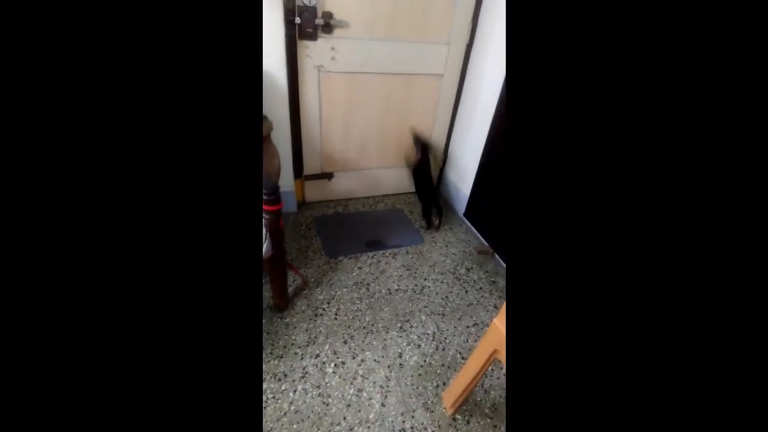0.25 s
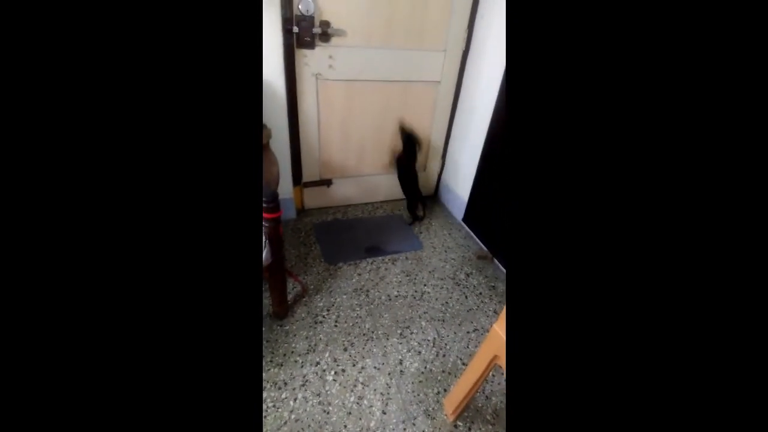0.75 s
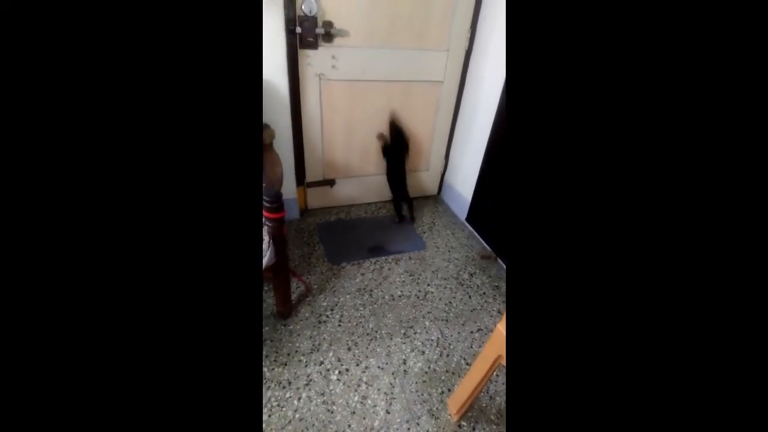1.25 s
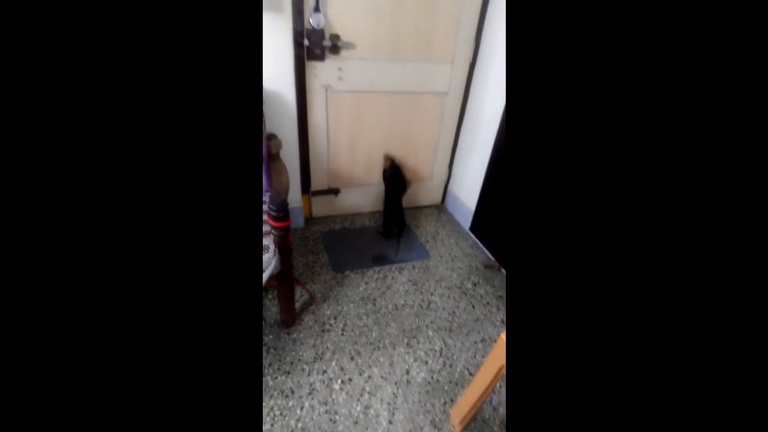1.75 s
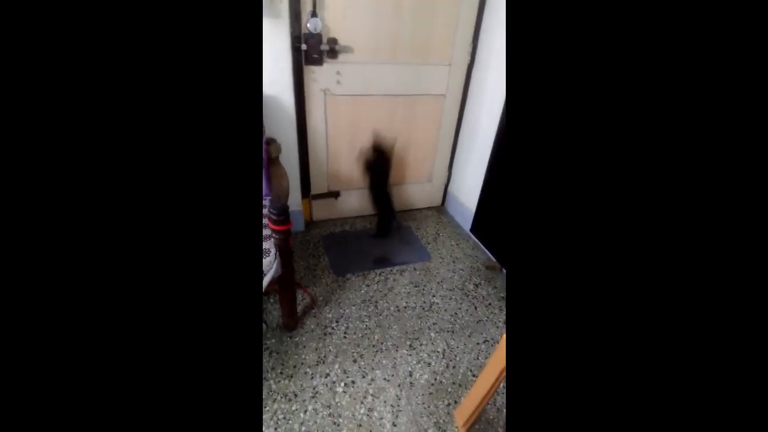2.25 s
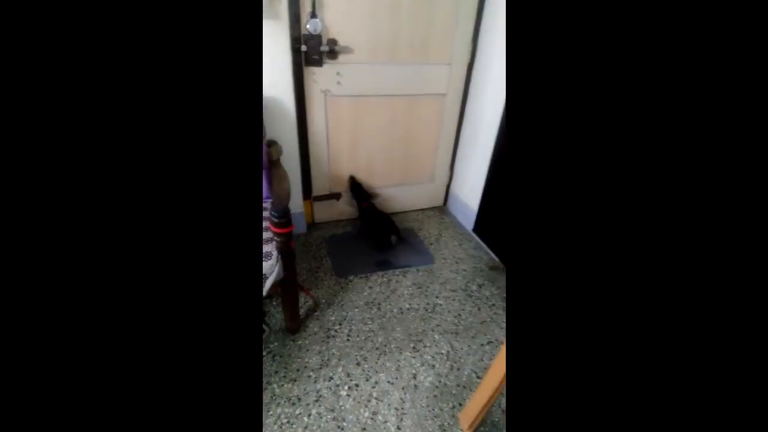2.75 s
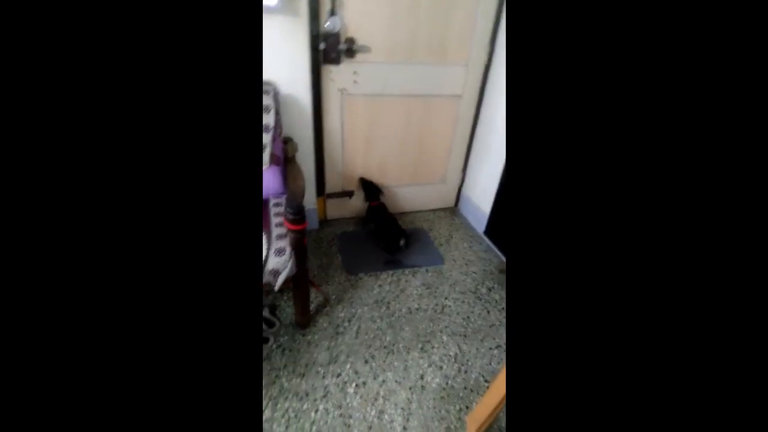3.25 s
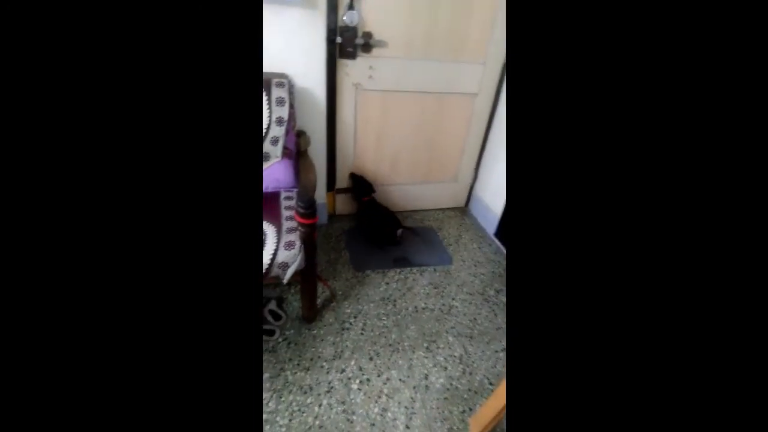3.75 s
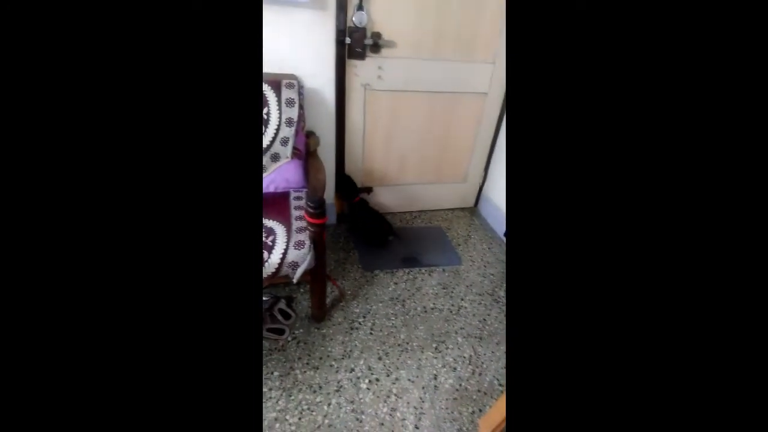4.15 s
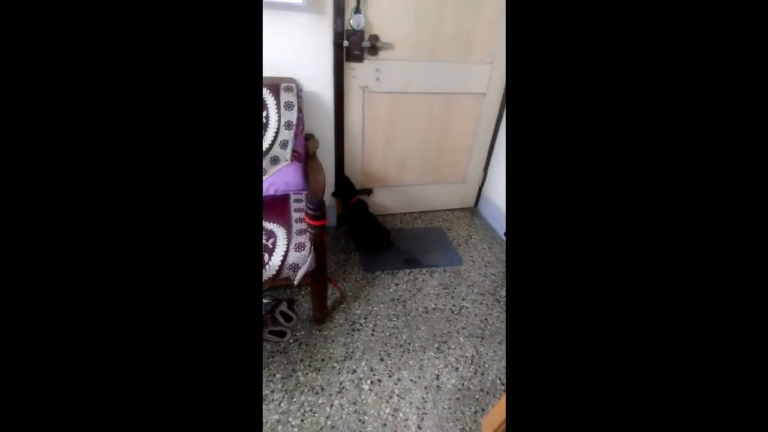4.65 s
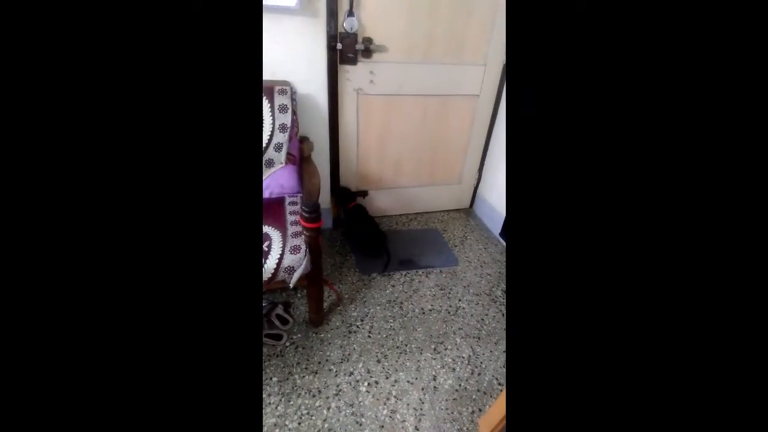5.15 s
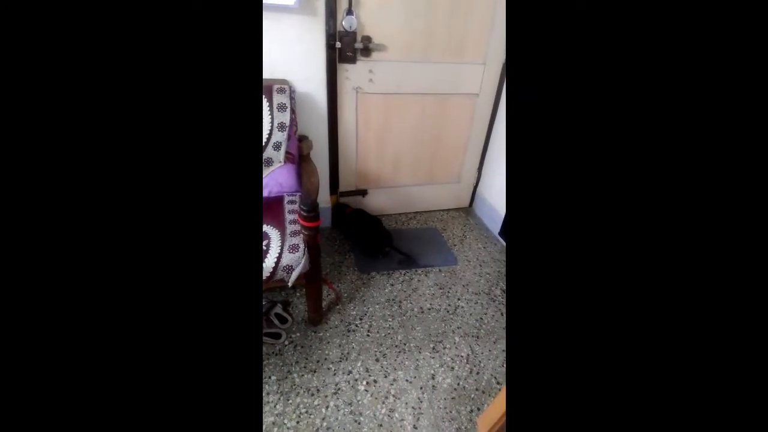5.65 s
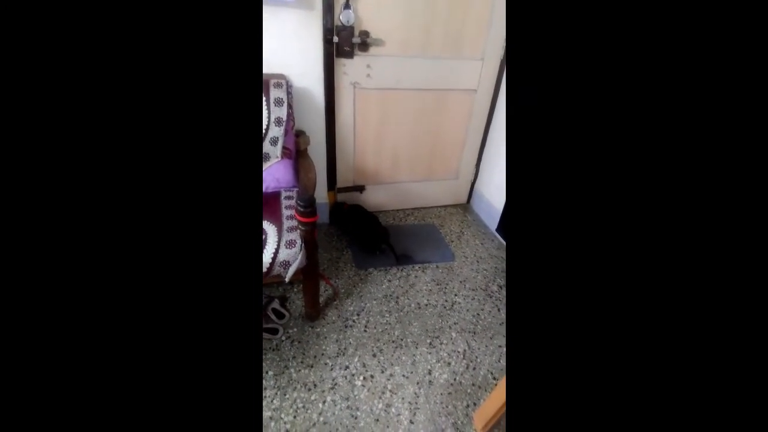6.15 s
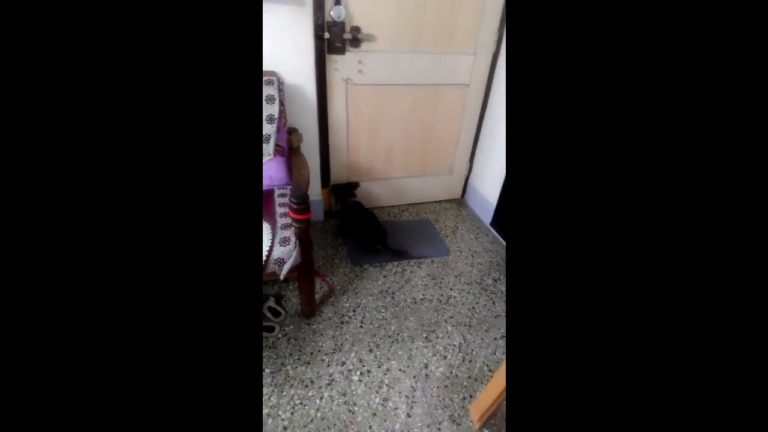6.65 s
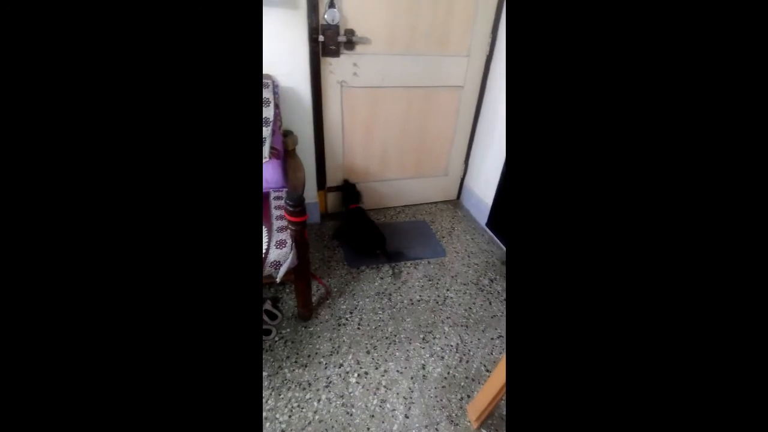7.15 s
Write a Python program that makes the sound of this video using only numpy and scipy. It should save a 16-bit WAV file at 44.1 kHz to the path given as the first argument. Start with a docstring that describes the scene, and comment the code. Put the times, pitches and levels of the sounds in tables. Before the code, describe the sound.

In a hard-floored, reverberant room, a small puppy cries a few metres from the microphone over a quiet low hush and hum. From 0 to 3.2 s short whines and yelps follow almost back to back, wavering around 400 to 900 Hz, nasal and breathy; a longer one slides down at about 2.75 to 3.05 s. Its paws bump a loose door with deep, dull thumps, strongest near 1.4 to 1.7 s and again at 2.7 s, with light scrapes and claw ticks, clearest at 1.4 s. A tiny squeak and weak whimper come around 3.4 s, a rising whine at 3.8 to 4 s, then very faint whimpering and thin nose whistles until 4.9 s. A piercing yelp drops steeply at 5.05 s, another lower one at 5.4 s. After near quiet with faint whistles, sharp falling yelps return at 6.5 and 7 s, the last trailing into a whimper.

```python
"""Puppy at a wooden door

A small puppy whines and yelps in a hard-floored room, heard from a few metres away.
Its cries are stacks of harmonics and pulsed breath shaped by the throat; its nose whistles with gliding tones.
Its paws ring the loose door panel at a few low pitches, and its claws tick and scrape as bursts of noise.
Short echoes and a fading tail of noise make the room ring, over a soft hush and a household hum.
"""
import sys
import numpy as np
from scipy import signal
from scipy.fft import rfft, irfft, next_fast_len
from scipy.io import wavfile
from scipy.ndimage import uniform_filter1d, map_coordinates

SR = 44100
rng = np.random.default_rng(int(sys.argv[2]) if len(sys.argv) > 2 else 0)


def generate_wav(signal):
    """Clip the signal to [-1, 1] and save it as 16-bit WAV at the path in sys.argv[1]."""
    frames = np.transpose(np.atleast_2d(signal))
    scaled = np.clip(frames, -1, 1) * 32767
    pcm = np.round(scaled).astype(np.int16)
    wavfile.write(sys.argv[1], SR, pcm)


def makeup_ratio(level_db):
    """Linear amplitude ratio for a level in decibels (20 dB per factor of ten)."""
    decades = np.asarray(level_db, float) / 20
    return 10 ** decades


N = 325987
T = np.arange(N) / SR  # time of every sample, s

# All levels in the tables are relative: the functions mix and scale them further.
# The puppy's cries, one curve each: (time [s], middle pitch [Hz], effort [dB])
CRY_CURVES = [
    [(0.0, 474, -42), (0.03, 461, -59), (0.055, 426, -58)],
    [(0.12, 506, -43.5), (0.14, 644, -41), (0.165, 740, -36), (0.19, 795, -37), (0.245, 740, -40),
     (0.275, 655, -34.5), (0.33, 651, -42.5), (0.355, 667, -37.5), (0.375, 792, -34), (0.43, 786, -63)],
    [(0.622, 435, -45.5), (0.65, 463.4, -43), (0.672, 539, -46.5), (0.692, 598.5, -39)],
    [(0.7, 803, -42), (0.75, 809.6, -38.5), (0.782, 794.5, -44.5), (0.81, 706, -43.5), (0.835, 664, -47.5),
     (0.9, 684, -71)],
    [(1.115, 780, -49.5), (1.15, 790, -36.5), (1.2, 657, -39.5), (1.27, 633, -41), (1.29, 653, -37),
     (1.32, 753.5, -39), (1.36, 709, -36.5), (1.42, 748, -71)],
    [(1.575, 577.3, -38), (1.61, 596, -41), (1.635, 639, -41), (1.665, 609.7, -41.5), (1.725, 589, -46.5),
     (1.745, 517, -38), (1.775, 489, -33.5), (1.85, 440, -42.5), (1.875, 419, -69)],
    [(1.95, 430, -51), (1.985, 438.3, -45), (2.003, 441, -33), (2.015, 490.4, -34.5), (2.045, 478, -53)],
    [(2.05, 560.5, -43), (2.075, 717, -36), (2.1, 710, -44.5), (2.113, 673, -25.5), (2.13, 650, -61.5),
     (2.16, 670, -45), (2.28, 714.4, -70)],
    [(2.295, 942, -41.5), (2.33, 941.5, -35.5), (2.347, 859, -45.5), (2.362, 722, -39), (2.387, 644, -35.5),
     (2.445, 631.3, -44), (2.51, 554, -32.5)],
    [(2.52, 408.5, -39.5), (2.54, 369.7, -41), (2.57, 379.4, -50), (2.63, 384.2, -58)],
    [(2.745, 684, -36.5), (2.773, 767.4, -30.5), (2.817, 508, -33), (2.857, 461.5, -32.5),
     (2.9, 444.5, -35), (2.977, 404.7, -35), (3.05, 351.7, -37)],
    [(3.06, 306, -44.5), (3.09, 292.7, -48.5), (3.2, 283, -50.5), (3.27, 282.4, -80)],
    [(3.372, 1060, -54), (3.378, 1120, -45.5), (3.405, 1144, -61), (3.445, 1101, -67)],
    [(3.455, 467.4, -54), (3.485, 450, -68), (3.495, 436, -43.5), (3.52, 432, -61.5), (3.535, 430, -53),
     (3.562, 400, -46.5), (3.575, 400, -74), (3.64, 435, -78)],
    [(3.785, 563.4, -48), (3.805, 639.7, -44), (3.818, 701, -39.5), (3.88, 724.4, -37), (3.945, 791, -39),
     (3.995, 762, -45), (4.02, 761, -56)],
    [(4.195, 690, -47), (4.23, 680, -56), (4.29, 671, -59.5), (4.44, 618.5, -65.5), (4.52, 648.5, -62.5),
     (4.7, 634, -73.5), (4.92, 667.5, -63.5)],
    [(5.04, 1666, -82), (5.052, 1646, -34.5), (5.061, 1566, -22.5), (5.067, 1410, -27.5),
     (5.074, 1292, -39), (5.09, 1240, -25), (5.11, 916, -32), (5.14, 680, -35.5), (5.188, 562, -34),
     (5.27, 577.7, -78)],
    [(5.376, 852, -43), (5.41, 812.4, -36), (5.46, 436, -27.5), (5.48, 359.6, -36.5), (5.512, 363, -35),
     (5.56, 410, -68)],
    [(6.52, 1620, -53), (6.535, 1600, -37), (6.541, 1528, -23), (6.549, 1401, -34), (6.559, 1202, -29),
     (6.579, 1123, -30.5), (6.589, 1038, -29), (6.605, 850, -33.5), (6.621, 843, -31.5),
     (6.632, 760, -28.5), (6.66, 680, -34.5), (6.717, 552.5, -32), (6.743, 396.2, -29.5),
     (6.81, 372.7, -57.5)],
    [(6.982, 1388, -37), (6.99, 1320, -35.5), (7.009, 1135, -31.5), (7.025, 1070, -37.5),
     (7.053, 827, -33.5), (7.072, 666, -36.5), (7.13, 608, -30), (7.18, 540, -38.5), (7.195, 531, -23.5),
     (7.23, 540.4, -95), (7.26, 506, -35.5), (7.3, 560, -68), (7.39, 549, -46)],
]
# How open the mouth is, one row per cry: (second harmonic over the first [dB], higher harmonics over the first [dB],
# closing speed [dB/s], loss from one harmonic to the next [dB], breath against the higher harmonics [dB])
MOUTH_SHAPES = [(-18, -8, -9, -1.1, -2), (-3, 2, 49.5, 2.8, -10.5), (-5.5, -14, 0, 0.8, 1),
                (-13, -8.5, 40, 4.5, -7), (-6.5, -0.5, 25.5, 1.4, -10.5), (-7, -9, 9, 2, -10.5),
                (-9.5, -9.5, -4, 1, -10), (-13.5, -7.5, 7, 1.5, -2), (-2, 6.5, 90, 2, -13.5),
                (2, -2, 32, -0.5, -8), (-10, -8.5, 15, 2.5, -14), (9, 4, 34, 3.9, -11.5),
                (10.5, 13, -2, -2, -20), (17.5, 15, 27, -0.46, -8), (-10, -5, -22, 3, -10.5),
                (2, -6, -1.5, 21, -4.5), (2, 2.5, 115, 5.5, -29.5), (-1.5, 5, 185, 6, -15.5),
                (-7, 0.5, 87, 2, -16.5), (-1.5, 2.5, 81, 12, -11)]
# How the head is held, one row per cry: (throat resonances over their rest pitch [ratio], treble level [dB],
# how slowly the treble comes out [s])
HEAD_POSES = [(.99, -11, 0.014), (1.05, 5, 0.038), (1.03, -7, .01), (0.86, 5, 0.007), (0.98, -1.5, 0.007),
              (1.01, 2, 0.0092), (0.986, 3.5, .04), (0.96, 2, 0.026), (1.009, 1.5, 0.022), (0.83, -1, .01),
              (0.99, 1, 0.0084), (1.13, -8, .01), (1.015, 4, 0.025), (1.004, -1.5, 0.027),
              (1.03, 1.5, 0.064), (1.04, -17, .01), (1.025, 10, 0.042), (1.047, -1, 0.015),
              (1.007, 2.5, 0.0088), (1.03, 3, 0.04)]
# Resonances of the throat: (frequency [Hz], level [dB])
THROAT_COLOUR = [(400, 10.5), (1100, -1.5), (1600, 5.5), (2000, -0.5), (2350, 7), (2850, -2.5), (3350, 6),
                 (3650, -12.5), (3950, -8), (4300, -10), (4700, 3.5), (5250, -1), (5850, 3.5),
                 (6400, -12.5), (7100, -6.5), (8500, -27), (14000, -58)]
# Hiss of air in the mouth: (frequency [Hz], level [dB])
BREATH_COLOUR = [(1200, -30), (1700, -14.5), (2300, 4.5), (2850, 2), (3450, -4), (3950, -13), (4350, -7.5),
                 (4700, -12.5), (5300, -14), (5850, -18.5), (6400, -11), (7000, -10.5), (8500, -20),
                 (14000, -36)]
# Small cavities that ring with the treble of the breath: (frequency [Hz], level [dB])
NOSE_COLOUR = [(4000, -5), (4350, -3), (4700, 5), (5250, -3), (5850, 5), (6350, -2), (7200, 0)]
# Stretches where the voice flutters more: (start [s], end [s], added depth [dB])
HOARSE_STRETCHES = [(3.455, 3.64, 4.5), (3.37, 3.45, 1.5), (3.8, 4.02, 2.5), (1.95, 2.28, 3.5),
                    (2.4, 2.63, 1.5), (5.41, 5.5, 1.5), (6.545, 6.7, 2), (7.0, 7.1, 2), (4.19, 4.92, 4),
                    (2.29, 2.36, 2.5), (1.57, 1.73, 2), (5.06, 5.2, 2)]
# Hush of the house: (frequency [Hz], level [dB])
HUSH_COLOUR = [(15, -49.5), (24, -18), (33, -3.5), (60, 3.5), (161, -4), (274, -8.5), (304, -7.5),
               (377, -10.5), (546, -10.5), (641, -18.5), (694, -14.5), (1860, -24.5), (2690, -25.5),
               (3330, -33), (14400, -50.5)]
# Household hum: (frequency [Hz], middle level [dB])
HUM_LINES = [(64.6, -66.5), (161.5, -65.5), (199.2, -75), (301.5, -65), (549.1, -70.5)]
# Echoes off the floor, door and walls: (delay [s], level [dB])
NEAR_ECHOES = [(.0011, -12), (.0029, -9.5), (.0047, -20), (.0078, -9), (.0113, -5), (0.0155, -10),
               (0.0206, -7)]
# How long the room rings: (frequency [Hz], time to fall by 60 dB, before a last fade-out [s])
ROOM_DECAY = [(60, 0.61), (300, 0.39), (800, 0.51), (2000, 0.48), (4500, 0.29), (6500, 0.42), (13000, 0.63)]
# Paws pushing the door: (time [s], strength [dB], tilt towards the deep modes [dB/octave])
PAW_PUSHES = [(0.417, -34, -7), (0.506, -28.5, -6), (0.563, -28.5, -1), (0.713, -31, 3), (0.911, -20, -7),
              (0.98, -30, 3), (1.09, -31.5, -9.5), (1.231, -34, -1), (1.3805, -14, -11),
              (1.407, -10.5, -6.5), (1.528, -15.5, -6.5), (1.677, -18, -2.5), (1.773, -27.5, -6),
              (1.944, -36, 0), (2.041, -30.5, -5), (2.361, -27.5, -11.5), (2.549, -27, -9),
              (2.598, -26, -3), (2.695, -14.5, -4.5), (2.769, -21, 10), (2.847, -23, -3), (2.986, -26, 8),
              (3.208, -28.5, 4.5)]
# Ways the door panel can ring: (frequency [Hz], level [dB], time to fall by 60 dB [s])
PANEL_MODES = [(36, -4.5, 0.83), (57.2, 2.5, 0.37), (68.6, -1, 0.27), (108.5, 0.5, 0.18),
               (144.7, -17.5, 0.41), (153.8, -26.5, 0.71), (247, -26, 0.22)]
# Paws sliding down the door: (start [s], strength [dB], time to swell to the peak [s])
PAW_SLIDES = [(0.446, -40.5, 0.042), (0.731, -32.5, 0.031), (0.785, -26.5, 0.014), (1.3, -38, 0.019),
              (1.59, -25, 0.032), (1.683, -31.5, 0.028), (2.33, -35.5, 0.019), (2.448, -29, 0.042),
              (2.551, -23, 0.021)]
# Claws striking the wood: (time [s], strength [dB], how slowly the drag fades [s], knock against the strike [dB])
CLAW_STRIKES = [(0.499, -36.5, 0.011, -30), (0.907, -28, 0.074, -28), (0.975, -32.5, 0.023, -57),
                (1.3697, -19.5, 0.037, -16), (1.4437, -14.5, 0.0071, -10.5), (2.2093, -28.5, 0.081, -19),
                (2.375, -25, 0.025, -27), (2.672, -24, 0.019, 9)]
# Colour of claws on wood: (frequency [Hz], level [dB])
WOOD_COLOUR = [(300, 5.5), (1000, -13), (1900, -11), (2450, 4.5), (3200, -2), (5000, -9.5), (8000, -24.5),
               (14000, -41)]
# Colour of the hollow knock: (frequency [Hz], level [dB])
KNOCK_COLOUR = [(120, -14), (250, 9.5), (400, -2.5), (900, -3.5), (2000, -7), (3300, -4.5), (3900, -71)]
# Whistles in the nose: (start [s], length [s], first pitch [Hz], last pitch [Hz], starting level [dB])
NOSE_WHISTLES = [(0.601, 0.016, 4040, 3760, -43), (3.335, 0.043, 3570, 3470, -53),
                 (3.406, 0.11, 12140, 12900, -52.5), (4.2, 0.073, 4640, 4880, -47),
                 (4.374, 0.085, 4284, 4420, -44), (4.938, 0.064, 3530, 3555, -48),
                 (4.986, 0.081, 4580, 5240, -43), (4.985, 0.11, 12850, 13460, -58),
                 (5.633, 0.02, 4100, 4346, -47.5), (5.651, 0.047, 4540, 4850, -40.5),
                 (2.197, 0.022, 3320, 3420, -43), (5.885, 0.17, 1503, 1460, -70),
                 (5.97, 0.052, 3420, 3300, -66), (6.495, 0.038, 13060, 12900, -56),
                 (6.969, 0.029, 12500, 12490, -62)]
# Air leaving the nose: (frequency [Hz], level [dB])
PUFF_COLOUR = [(600, -40), (1300, 6.5), (3000, -0.5), (4600, -5), (6500, 1), (10000, -10), (14000, -28.5)]
# Difference between left and right against the middle: (frequency [Hz], level [dB])
WIDTH_COLOUR = [(2500, -75.5), (3400, -49), (4500, -36), (6000, -23), (9000, -2.5), (12000, -7),
                (14000, -38)]

TREBLE_HZ, TREBLE_HELD_DB = 3900, 11  # above here the voice beams; so much is lost while the nose points away
BREAK_DB, BREAK_MOST_DB = 1.6, 16  # fast slides break treble lines into hiss: loss per octave a second, and at most
SQUEAL_HZ, SQUEAL_DB = 850, 10  # above this pitch the voice thins to a purer tone, dB per octave
SHUT_DB, OPENING_S = -1.5, 0.014  # change in the closing loss at each start, and how fast it dies away
SECOND_CLOSING = 0.91  # the second harmonic loses this share of what the higher ones lose
ROCK_S, ROCK_LOSS_DB = 0.1, 8  # the loose door swings back after each push: delay and drop in level
WHISTLE_FADE_DB, WHISTLE_BEND = 10.5, 0.69  # loss from start to end; a bend under 1 makes the glide come early
TOP_HZ = 14300  # upper limit of the sound


def along(points, hz):
    """Reads a value between (Hz, value) points, spacing pitch on a log axis as the ear does."""
    point_hz, values = np.transpose(points)
    return np.interp(np.log(hz + 1), np.log(point_hz + 1), values)


def coloured(x, spectrum):
    """Filters a sound by strengthening or weakening each frequency as a (Hz, dB) spectrum says."""
    size = next_fast_len(N + 8192)
    gain = makeup_ratio(along(spectrum, np.fft.rfftfreq(size, 1 / SR)))
    return irfft(rfft(x, size) * gain, size)[:N]


def wobble(rate):
    """Draws a smooth random curve through a given number of random points a second."""
    points = rng.standard_normal(int(N * rate / SR) + 4)
    return map_coordinates(points, [T * rate])


def played(calls, edge):
    """Joins the curves of all calls, with a gate that opens and shuts over edge seconds around each."""
    times, *columns = np.transpose(np.concatenate(calls))
    gate = sum(np.clip(np.minimum(T - c[0][0], c[-1][0] - T) / edge + .5, 0, 1) for c in calls)
    return [np.interp(T, times, column) for column in columns], np.minimum(gate, 1)


def cries():
    """Vocal folds with a waver: a stack of harmonics and breath pulsed once a cycle, shaped by throat and mouth."""
    (hz, first_db), gate = played(CRY_CURVES, edge=.01)
    starts = np.array([cry[0][0] for cry in CRY_CURVES])
    current = np.maximum(np.searchsorted(starts, T + .005) - 1, 0)
    since_start = T - starts[current]
    age = np.maximum(since_start, 0)
    second_db, high_db, closing, loss_db, breath_db = np.transpose(MOUTH_SHAPES)[:, current]
    shift, treble_db, turn_s = np.transpose(HEAD_POSES)[:, current]

    # Nose, jaw and pitch set the brightness
    treble_db = treble_db - TREBLE_HELD_DB * np.exp(-(age / turn_s) ** 2)
    closed_db = closing * since_start + SQUEAL_DB * np.log2(np.maximum(hz / SQUEAL_HZ, 1))
    closed_db += SHUT_DB * np.exp(-age / OPENING_S)
    second_db = first_db + second_db - SECOND_CLOSING * closed_db
    # Brightness follows a smoothed effort
    high_db = uniform_filter1d(first_db, size=1100) + high_db - closed_db
    slide = uniform_filter1d(np.abs(np.gradient(np.log2(hz))) * SR, size=400)  # octaves a second
    broken_db = np.minimum(BREAK_DB * slide, BREAK_MOST_DB)

    # Waver in pitch and flutter in level
    hz = hz * (1 + .014 * wobble(40))
    depth_db = 2.2 + sum(db * (T > start) * (T < end) for start, end, db in HOARSE_STRETCHES)
    flutter_db = depth_db * (.85 * wobble(70) + .4 * wobble(300))
    jitter = (depth_db - 1) * (.005 * wobble(90) + .004 * wobble(350))
    phase = 2 * np.pi * np.cumsum(hz * (1 + jitter)) / SR

    # The two lowest harmonics
    first = makeup_ratio(first_db + along(THROAT_COLOUR, hz)) * np.sin(phase)
    second_db = second_db + along(THROAT_COLOUR, 2 * hz / shift) + 2.5 * wobble(30)
    low = first + makeup_ratio(second_db) * np.sin(2 * phase)

    # Higher harmonics, with levels worked out at every 32nd sample
    step = slice(None, None, 32)
    k = np.arange(3, 24)[:, None]
    weight = makeup_ratio(along(THROAT_COLOUR, k * (hz / shift)[step]) - loss_db[step] * k)
    # Even out their total slowly: lines still swell as they cross a resonance
    weight /= np.sqrt(uniform_filter1d(np.sum(weight ** 2, 0), size=100))
    beamed = np.clip((k * hz[step] - TREBLE_HZ) / 400 + .5, 0, 1)
    weight *= makeup_ratio((treble_db - broken_db)[step] * beamed)
    # Below 520 Hz alternate cycles are nearly alike: the odd lines fade with the lowest
    second_source_db = second_db_source(first_db, current, closed_db)
    doubled_db = np.where(hz < 520, np.clip(first_db - second_source_db, -18, 0), 0)[step]
    weight *= makeup_ratio(k % 2 * doubled_db)
    high = np.zeros(N)
    for n, w in zip(k[:, 0], weight):
        high += np.interp(T, T[step], w) * makeup_ratio(4 * wobble(60)) * np.sin(n * phase)

    # Breath, its treble beamed like that of the voice
    breath = coloured(rng.standard_normal(N) * (1 + 1.2 * np.cos(phase)), BREATH_COLOUR)
    breath /= np.std(breath)
    highpass = signal.butter(4, TREBLE_HZ, "high", fs=SR, output="sos")
    beam = signal.sosfiltfilt(highpass, breath)
    beam_out = makeup_ratio(treble_db + 0.3 * broken_db) * coloured(beam, NOSE_COLOUR)
    high += makeup_ratio(breath_db) * (breath - beam + beam_out)
    return np.sqrt(2) * gate * makeup_ratio(flutter_db) * (low + makeup_ratio(high_db) * high)


def second_db_source(first_db, current, closed_db):
    """Level of the second harmonic as it leaves the vocal folds, before the throat colours it."""
    return first_db + np.transpose(MOUTH_SHAPES)[0, current] - SECOND_CLOSING * closed_db


def background():
    """Hush of the house as noise that swells slowly, with steady-pitched hum lines of unsteady level."""
    hush = coloured(rng.standard_normal(N), HUSH_COLOUR)
    hum = np.zeros(N)
    for hz, db in HUM_LINES:
        phase = 2 * np.pi * hz * T + 0.78 * wobble(9.1)
        hum += makeup_ratio(db + 3.7 * wobble(9)) * np.sqrt(2) * np.sin(phase)
    return makeup_ratio(-54.5 + 1.5 * wobble(1.5)) * hush / np.std(hush) + hum


def echoes(near):
    """Nearby surfaces send back delayed, weaker copies of the sound."""
    return sum(makeup_ratio(db) * np.pad(near, (round(s * SR), 0))[:N] for s, db in NEAR_ECHOES)


def room_tail(seconds):
    """Room answer of energy 1: noise whose frequencies die at their own speeds, with no band favoured."""
    hz, t, z = signal.stft(rng.standard_normal(int(seconds * SR)), SR, nperseg=256)
    decay = makeup_ratio(-60 * t / along(ROOM_DECAY, hz)[:, None])
    answer = signal.istft(z * decay, SR, nperseg=256)[1]
    spectrum = rfft(answer)
    answer = irfft(spectrum / np.sqrt(uniform_filter1d(np.abs(spectrum) ** 2, size=30)))
    kept = len(answer) * 3 // 4
    answer = answer[:kept] * np.hanning(kept * 2)[kept:]  # fade out
    return answer / np.linalg.norm(answer)


def door():
    """Each push and its rebound ring the panel's modes at new strengths; the tilt sets the share of deep ones."""
    out, t = np.zeros(N + SR), np.arange(SR // 2) / SR
    hz, level_db, t60 = np.transpose(PANEL_MODES)[:, :, None]
    chance = rng.standard_normal((len(PAW_PUSHES), 2, len(PANEL_MODES), 1))
    soft_start = 1 - np.exp(-t / 0.016)  # soft pads
    for (s, db, deep_db), pair in zip(PAW_PUSHES, chance):
        tilt_db = deep_db * np.log2(70 / np.minimum(hz, 150))
        for k, luck in enumerate(pair):  # the push, then its rebound
            push_db = db - 5.0 - k * ROCK_LOSS_DB
            gain = makeup_ratio(push_db + level_db + 1.86 * luck + tilt_db - 60 * t / t60)
            ring = np.sum(gain * np.sin(2 * np.pi * hz * t), 0)
            out[round((s + k * ROCK_S) * SR):][:len(t)] += ring * soft_start
    return out[:N]


def claws():
    """A tick that drags into grit while the toes knock the hollow panel; slides swell and fade without a tick."""
    tick, scrape, knock = np.zeros((3, N))
    for s, db, length, knock_db in CLAW_STRIKES:
        after = np.maximum(T - s, 0)
        push = makeup_ratio(db - 5.5) * (1 - np.exp(-after / 0.0014))
        tick += push * 3.12 * np.exp(-after / 0.0052)
        scrape += push * 0.5 * np.exp(-after / length)
        knock += push * makeup_ratio(knock_db) * np.exp(-after / 0.04)
    for s, db, length in PAW_SLIDES:
        u = np.maximum(T - s, 0) / length
        scrape += makeup_ratio(db - 4.0) * u * np.exp(-u)
    roughness = makeup_ratio(5.5 * wobble(300) + 3 * wobble(50))
    grit = coloured(rng.standard_normal(N) * roughness, WOOD_COLOUR)
    hollow = coloured(rng.standard_normal(N), KNOCK_COLOUR)
    crack = coloured(rng.standard_normal(N), WOOD_COLOUR)
    return tick * crack / np.std(crack) + scrape * grit / np.std(grit) + knock * hollow / np.std(hollow)


def whistles():
    """Air whistling in the nose: a rough, wavering sine that glides and fades, in a puff of hiss."""
    out = np.zeros(N)
    hiss = coloured(rng.standard_normal(N), PUFF_COLOUR)
    hiss *= makeup_ratio(-15.5) / np.std(hiss)
    for s, length, first_hz, last_hz, db in NOSE_WHISTLES:
        u = np.clip((T - s) / length, 0, 1)
        gate = np.clip(np.minimum(T - s, s + length - T) / .008 + .5, 0, 1)
        gate = np.sin(gate * np.pi / 2) ** 2
        hz = first_hz + (last_hz - first_hz) * u ** WHISTLE_BEND
        rough_hz = np.minimum(hz / 40, 110) * wobble(400)
        phase = 2 * np.pi * np.cumsum(hz * (1 + .013 * wobble(60)) + rough_hz) / SR
        octave = makeup_ratio(-31.5) * (hz < SR / 8) * np.sin(2 * phase)  # faint, and only over the lower whistles
        level = makeup_ratio(db - WHISTLE_FADE_DB * u)
        out += np.sqrt(2) * gate * level * (np.sin(phase) + octave + hiss)
    return out * makeup_ratio(0.55 * wobble(77))


def scene():
    """The direct sound is weak at this distance; near surfaces and the room carry most of it."""
    near = cries() + whistles() + claws()
    early = near + echoes(near)
    wet = signal.fftconvolve(np.pad(near, (400, 0)), room_tail(0.95))[:N]
    mid = makeup_ratio(-6.5) * early + makeup_ratio(-6.5) * wet + door() + background()
    return np.array([mid, mid])


def top_cut(x):
    """Nothing passes above the cut-off."""
    return signal.sosfilt(signal.butter(12, 14540, fs=SR, output="sos"), x)


def record(dry):
    """The channels share their bass and differ mainly in the treble; a steep filter cuts the very top."""
    side = coloured(dry[0] * wobble(150), WIDTH_COLOUR)  # the difference flickers in sign and size
    limit = signal.butter(24, TOP_HZ, fs=SR, output="sos")
    mix = signal.sosfilt(limit, dry + [side, -side])
    return top_cut(mix)


dry = scene()
out = record(dry)
generate_wav(out)
```